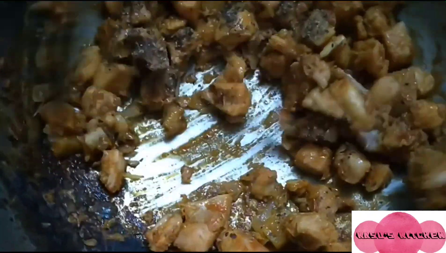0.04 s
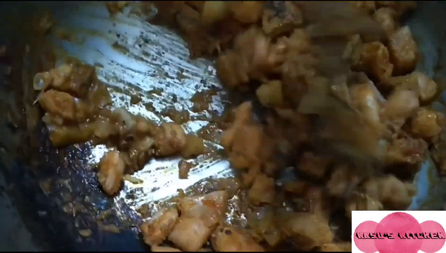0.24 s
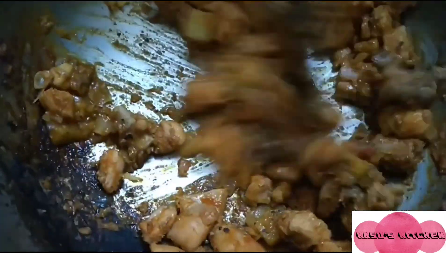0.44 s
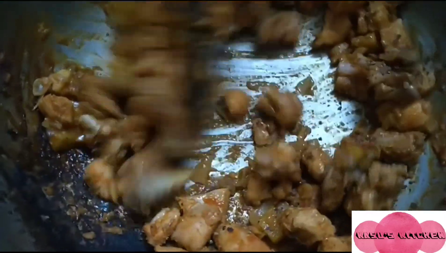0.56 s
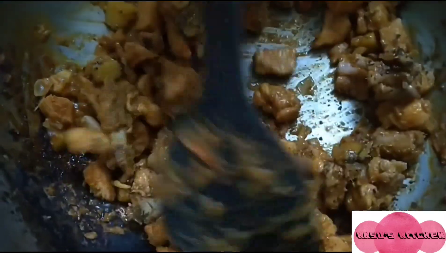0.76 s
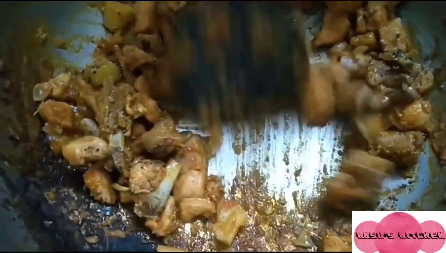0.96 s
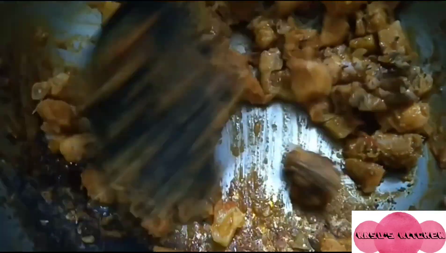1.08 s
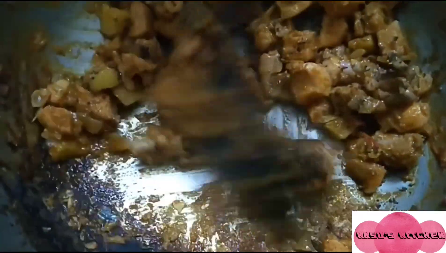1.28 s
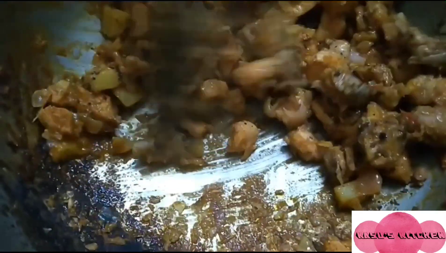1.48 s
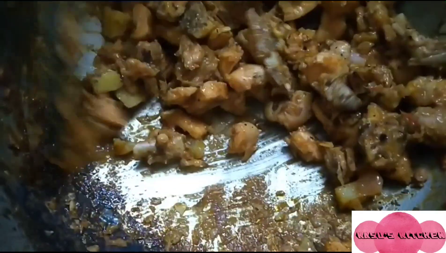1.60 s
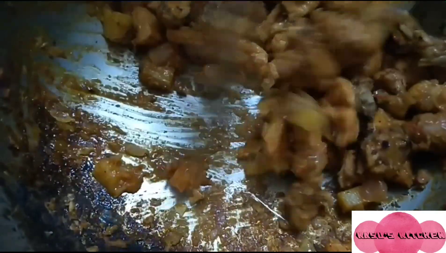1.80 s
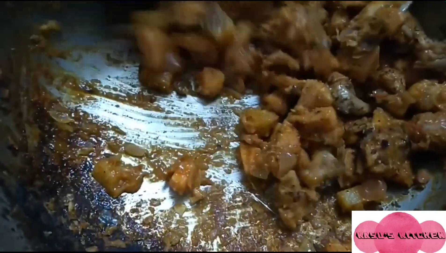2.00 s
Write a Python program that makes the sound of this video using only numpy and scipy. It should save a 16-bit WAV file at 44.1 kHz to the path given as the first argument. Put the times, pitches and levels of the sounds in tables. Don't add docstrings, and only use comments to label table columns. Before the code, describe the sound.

Stirring chicken in a steel pan: gritty spatula scrapes, two sharper knocks, small moist smacks.

```python
import sys
import numpy as np
from scipy import signal
from scipy.fft import rfft, irfft, next_fast_len
from scipy.io import wavfile

SR = 44100
rng = np.random.default_rng(int(sys.argv[2]) if len(sys.argv) > 2 else 0)


def decibels_to_gain(level_db):
    exponent = np.asarray(level_db, float) / 20
    return 10 ** exponent


def put_to_file(sound):
    columns = np.atleast_2d(sound).T
    safe = np.clip(columns, -1, 1)
    whole_steps = np.round(safe * 32767)
    wavfile.write(sys.argv[1], SR, whole_steps.astype(np.int16))


N = 90404

# pitch in Hz, level in dB per Hz.
AIR_COLOUR = [(25, 5), (60, 1.5), (280, -7), (400, -10), (2300, -17), (3300, -22.5), (5000, -46.5),
              (14000, -37.5)]
# pitch in Hz, width in Hz, level in dB.
HUM = [(98, 8, -76), (200, 10, -80), (288, 8, -77), (845, 25, -83)]
STROKE_STARTS = [-.02, .219, .250, .486, .555, .665, .965, 1.073, 1.180, 1.24, 1.360, 1.415, 1.485, 1.737,
                 1.805]
# hold in seconds, level in dB, extra brightness in dB per octave.
STROKES = [(0.11, -66, 0.5), (0.0016, -80, -11), (0.13, -64, -1.5), (0.026, -69, 1.5), (0.15, -70.5, -1),
           (0.089, -72.5, 3.5), (0.19, -86, 6), (0.1, -72, 1), (0.0069, -69.5, -0.5), (0.16, -80.5, -7),
           (0.013, -71, -1), (0.062, -71.5, -0.5), (0.074, -70.5, 1), (0.014, -73, 7.5), (0.089, -66, -2.5)]
# pitch in Hz, width in Hz, level in dB.
DRAG_COLOUR = [(2300, 900, 3), (3860, 2240, -1.5), (5710, 1400, -8.5), (6900, 1730, -2.5), (8480, 1570, -5),
               (11700, 2000, -9), (13000, 530, -7.5), (14800, 2900, -2)]
# start in seconds, peak in dB, pitch in Hz, T60 in seconds.
SMACKS = [(0.0074, -94, 14400, 0.012), (0.0597, -55, 7850, 0.024), (0.104, -69, 9880, 0.012),
          (0.282, -49.5, 12400, 0.013), (0.3072, -62, 5170, 0.018), (0.3693, -51, 7300, 0.021),
          (0.486, -55, 7470, 0.041), (0.537, -64.5, 8010, 0.022), (0.556, -52, 14600, 0.015),
          (0.5704, -71, 13700, 0.012), (0.583, -75, 7300, 0.011), (0.622, -56, 13000, 0.017),
          (0.671, -51, 8800, 0.0084), (0.679, -55, 13000, 0.015), (0.741, -60, 11500, 0.019),
          (0.7754, -62.5, 9650, 0.016), (0.9686, -64, 14000, 0.0097), (1.0742, -51.5, 13300, 0.0065),
          (1.118, -57, 8900, 0.02), (1.1837, -55, 8100, 0.034), (1.364, -58, 6600, 0.01),
          (1.4174, -65, 14300, 0.012), (1.4256, -57, 8850, 0.013), (1.4891, -52.5, 8000, 0.012),
          (1.5397, -53.5, 8200, 0.014), (1.8066, -52.5, 6940, 0.011), (1.8193, -47, 6940, 0.0095),
          (1.855, -53, 14800, 0.014), (1.8737, -59, 6800, 0.02), (1.945, -67, 12000, 0.012)]
# start in seconds, ring in dB, contact hardness in Hz, thud in dB.
KNOCKS = [(.030, -50, 804, -40), (0.088, -51, 510, -40.5), (0.22, -60, 1520, -39),
          (0.2497, -21, 1680, -28.5), (0.369, -48, 775, -37.5), (.487, -72, 2920, -45),
          (0.494, -50, 700, -45), (0.5223, -42, 820, -37.5), (.585, -55, 3120, -39.5),
          (.622, -51, 710, -41.5), (0.671, -60, 3000, -45.5), (1.113, -55, 2000, -44),
          (1.185, -71, 1990, -41), (1.212, -57, 600, -45.5), (1.247, -71, 604, -44),
          (1.284, -66, 600, -51.5), (1.364, -37, 636, -31), (1.523, -58, 885, -44.5),
          (1.737, -28.5, 2050, -32), (1.828, -56.5, 4160, -43)]
PAN_HZ = [460, 635, 845, 983, 1170, 1395, 1521, 1790, 2050, 2243, 2406, 2533, 3650, 3950]
# level in dB, T60 in seconds.
PAN_MODES = [(-11.5, 0.16), (0, 0.028), (1, 0.029), (-8, 0.029), (-9.5, 0.054), (-4.5, 0.083),
             (-7.5, 0.085), (1.5, 0.045), (-4, 0.067), (9, 0.021), (4, 0.042), (-21, 0.029), (4, 0.03),
             (-23, 0.013)]
# pitch in Hz, level in dB, T60 in seconds.
BASE_MODES = [(124, -16.5, 0.22), (193, -6.5, 0.043), (231.7, -8.5, 0.085), (308, -8, 0.079)]
FIRST_SPOT_DB = [-2.2, -1.7, -3.1, 2.4, -0.48, -0.21, 1.5, 3.1, 1.4, -1.2, 0.1, -1.3, -0.18, 0.1]
SECOND_SPOT_DB = [-0.8, -3.5, 5, -4.5, 4.2, -16, -13, -4.5, 2, 6, 5.8, -16, -5, 4]
# start in seconds, peak in dB, pitch in Hz, T60 in seconds,
# width as a share of pitch.
SKIDS = [(.030, -47.5, 4350, 0.11, 0.95), (.220, -53, 2200, 0.077, 0.21), (.250, -35.5, 5040, 0.011, 0.14),
         (.2585, -21, 2254, 0.046, 0.27), (.256, -37.5, 2115, 0.51, 0.23), (.251, -37.5, 3500, 0.13, 0.28),
         (.487, -49.5, 3540, 0.12, 0.92), (.585, -42, 2260, 0.2, 1), (.585, -36.5, 2850, 0.028, .15),
         (.670, -48, 3820, 0.063, 0.82), (1.113, -49, 2300, 0.11, 0.48), (1.737, -41.5, 3780, 0.027, 0.35),
         (1.184, -49, 2400, 0.24, 0.26), (1.184, -44, 4650, 0.048, 1), (1.362, -69, 3520, 0.066, 0.5),
         (1.737, -40, 8500, 0.052, 0.17), (1.737, -44, 6900, 0.04, 0.083),
         (1.828, -40.5, 2300, 0.099, 0.37), (1.85, -44.5, 2300, 0.23, 0.3)]
# start in seconds, level in dB, pitch in Hz, T60 in seconds.
CLINKS = [(0.24, -32, 3900, 0.019), (.2497, -47, 3644, 0.093), (0.3, -38.5, 1920, 0.022),
          (1.737, -41, 2065, 0.075), (1.737, -50.5, 480, 0.31), (1.737, -50, 740, 0.09),
          (1.736, -51, 3900, 0.014), (1.364, -52, 720, 0.11), (1.364, -54, 823, .1), (0.44, -48, 2700, .02),
          (1.8285, -41, 1925, 0.082), (.2497, -53, 2700, 0.097), (1.113, -52, 2230, 0.12),
          (1.113, -59.5, 4200, 0.078), (1.113, -51, 667, 0.063), (1.113, -61, 1350, 0.19),
          (1.184, -54, 645, 0.064), (.030, -49, 655, 0.062), (.507, -47, 1010, 0.019)]
# start in seconds, peak in dB, pitch in Hz, T60 in seconds.
TICKS = [(0.03, -60, 7900, .008), (0.29, -52, 13100, 0.0036), (0.308, -55, 8950, .005),
         (0.326, -61, 8300, .08), (0.326, -62, 6400, .08), (0.339, -51.5, 6300, 0.012),
         (0.350, -64, 7050, 0.0045), (0.356, -60, 7500, 0.0039), (0.413, -71, 7400, 0.015),
         (0.9173, -63.5, 4840, 0.01), (1.9403, -59, 4470, 0.0074), (1.063, -57, 14200, 0.0056),
         (1.275, -65, 5300, .008), (1.3329, -67, 8700, 0.007), (1.359, -55.5, 8900, 0.0065)]
# start in seconds, peak in dB, pitch in Hz, T60 in seconds.
SPITS = [
    (1.0445, -59, 4960, 0.0079),
    (1.135, -56, 8000, 0.012),
    (1.365, -56, 14000, .012),
    (1.472, -57, 6800, 0.011),
    (1.503, -61, 14000, .008),
    (1.520, -61, 13000, .006),
    (1.570, -62, 14000, .006),
    (1.612, -65, 6540, 0.016),
]
# pitch in Hz, sharpness, share removed from 0 to 1.
VALLEYS = [(395, 4.0, .95), (1603, 12.7, 0.55), (3000, 9.6, 0.43), (4656, 6.05, 0.3)]

FIRST_BLOW, SECOND_BLOW = 3, 18
PAN_LOW_HZ = 373
WET_DB = -0.5
DROP_WIDTH = 0.14


def rms_one(x):
    return x / np.sqrt(np.mean(x ** 2) + 1e-20)


def highpass(x, hz):
    return signal.sosfilt(signal.butter(3, hz, "high", fs=SR, output="sos"), x)


def drift(rate_hz):
    r = np.exp(-80 * np.pi * rate_hz / SR)
    noise = rng.standard_normal(N // 40 + 2002)
    slow = signal.lfilter([1], [1, -2 * r, r * r], noise)[2000:]
    return np.interp(np.arange(N) / 40, np.arange(len(slow)), rms_one(slow))


def ring(x, hz, t60):
    r, w = decibels_to_gain(-60 / (t60 * SR)), 2 * np.pi * hz / SR
    return signal.lfilter([0, np.sin(w)], [1, -2 * r * np.cos(w), r * r], x + 1e-18)


def resonance(x, hz, width_hz):
    t60 = 2.2 / width_hz
    return ring(ring(x, hz, t60), hz, t60)


def push(hz):
    t = np.arange(600) / SR
    force = t * np.exp(-2 * np.pi * hz * t)
    return force / force.sum()


def bursts(rows, gain_db):
    out, t = np.zeros(N + SR), np.arange(12000) / SR
    for s, db, hz, t60, width in rows:
        noise = rng.standard_normal(len(t))
        burst = highpass(rms_one(resonance(noise, hz, width * hz)), hz / 2)
        i = int(s * SR)
        out[i:i + len(t)] += decibels_to_gain(db + gain_db - 60 * t / t60) * burst
    return out[:N]


def air():
    noise_db, flicker_db = -65.5, 1.5
    out, edges = 0, 20 * 2 ** np.arange(0, 9.8, .5)
    white = rng.standard_normal((2, N))
    hz, db = np.transpose(AIR_COLOUR)
    for k, (low, high) in enumerate(zip(edges, edges[1:])):
        band = signal.sosfilt(signal.butter(2, [low, high], "band", fs=SR, output="sos"), white[k % 2])
        band_db = np.interp(np.log(low * high) / 2, np.log(hz), db)
        out = out + decibels_to_gain(band_db + flicker_db * drift(3.5)) * band
    hum = sum(decibels_to_gain(d) * rms_one(resonance(white[0], f, w)) for f, w, d in HUM)
    return decibels_to_gain(noise_db) * rms_one(out) + hum


def strokes():
    attack_s, sag_db_per_s, release_db_per_s, rest_db = .003, 32.5, 165, -91.5
    t = np.arange(N) / SR
    plain = bright = decibels_to_gain(rest_db) ** 2
    for s, (hold, db, bright_db) in zip(STROKE_STARTS, STROKES):
        age = t - s
        fall_db = sag_db_per_s * age + release_db_per_s * np.maximum(age - hold, 0)
        power = (np.clip(age / attack_s, 0, 1) * decibels_to_gain(db - np.maximum(fall_db, 0))) ** 2
        plain = plain + power
        bright = bright + power * decibels_to_gain(bright_db) ** 2
    return 10 * np.log10(plain), 10 * np.log10(bright / plain)


def edge_slips():
    slips_per_s, spread_db, clump_db = 4600, -2, 2.2
    grit_per_s, grit_db = 40, 1.5
    sizes = decibels_to_gain(spread_db * np.minimum(rng.exponential(1, N), 5)) * rng.choice([-1, 1], N)
    slips = sizes * (rng.random(N) < slips_per_s / SR) * decibels_to_gain(clump_db * drift(27.0))
    gritty = rng.random(N) < grit_per_s * 8 / SR * decibels_to_gain(6 * drift(30))
    return slips * np.where(gritty, decibels_to_gain(grit_db / 2), 1)


def drag():
    hiss_db, patch_db = 0.5, 3.5
    body_db, body_follows = -2, 0.29
    level_db, bright_db = strokes()
    slips = edge_slips()
    hiss = 0
    for k, (hz, width, db) in enumerate(DRAG_COLOUR):
        band = rms_one(resonance(slips, hz, 1.38 * width))
        band_db = db + patch_db * drift(15.3) + bright_db * np.log2(hz / 7000)
        hiss = hiss + (-1) ** k * decibels_to_gain(band_db) * band
    body = sum(decibels_to_gain(d) * ring(slips, hz, 0.98 * t) for hz, (d, t) in zip(PAN_HZ, PAN_MODES))
    body = rms_one(highpass(body, PAN_LOW_HZ))
    mean_db = level_db.mean()
    body_level_db = mean_db + body_follows * (level_db - mean_db) + body_db
    return decibels_to_gain(level_db + hiss_db) * hiss + decibels_to_gain(body_level_db) * body


def smacks():
    return bursts([(*row, 0.36) for row in SMACKS], WET_DB)


def knocks():
    mode_scatter_db, ring_trim_db = 2, -8.5
    crack_hz, crack_t60_s, crack_db = 1276, 0.0056, 9.5
    chatter_db, chatter_t60_s = -27.5, 0.084
    thud_cut_hz, thud_lead_s, base_low_hz = 231, 0.0014, 105.5
    pans, bases, size = np.zeros(N + SR), np.zeros(N + SR), SR // 4
    spots_db = mode_scatter_db * rng.standard_normal((len(KNOCKS), len(PAN_MODES)))
    spots_db[FIRST_BLOW], spots_db[SECOND_BLOW] = FIRST_SPOT_DB, SECOND_SPOT_DB
    cracks_db = np.full(len(KNOCKS), crack_db)
    cracks_db[SECOND_BLOW] -= 3.5
    chatter_fade = decibels_to_gain(chatter_db - 60 * np.arange(size) / SR / chatter_t60_s)
    click = np.zeros(size)
    click[0] = -1
    soft = np.convolve(click, push(thud_cut_hz))[:size]
    thud = sum(decibels_to_gain(d) * ring(soft, hz, t) for hz, d, t in BASE_MODES)
    for (s, db, hard_hz, thud_db), spot_db, snap_db in zip(KNOCKS, spots_db, cracks_db):
        hit = np.convolve(click, push(hard_hz))[:size]
        rattle = rng.standard_normal(size) * chatter_fade
        shaken = hit + np.convolve(rattle, push(hard_hz))[:size]
        pan = sum(decibels_to_gain(d + ring_trim_db + extra) * ring(shaken, hz, t)
                  for hz, (d, t), extra in zip(PAN_HZ, PAN_MODES, spot_db))
        crack = decibels_to_gain(snap_db) * ring(hit, crack_hz, crack_t60_s)
        i = int(s * SR)
        pans[i:i + size] += decibels_to_gain(db) * (pan + crack)
        i -= int(thud_lead_s * SR)
        bases[i:i + size] += decibels_to_gain(thud_db) * thud
    bases = highpass(highpass(bases[:N], base_low_hz), base_low_hz)
    return highpass(pans[:N], PAN_LOW_HZ) + bases


def skids():
    return bursts(SKIDS, -9)


def ticks():
    return bursts([(*row, DROP_WIDTH) for row in TICKS], WET_DB)


def clinks():
    out = np.zeros(N)
    for s, db, hz, t60 in CLINKS:
        click = np.zeros(N)
        click[int(s * SR)] = decibels_to_gain(db)
        out += ring(click, hz, t60)
    return highpass(out, PAN_LOW_HZ)


def spits():
    return bursts([(*row, DROP_WIDTH) for row in SPITS], WET_DB)


def valleys(x):
    for hz, sharp, share in VALLEYS:
        x = x - share * signal.lfilter(*signal.iirpeak(hz, sharp, fs=SR), x)
    return x


def kitchen(x):
    t60_s, wall_cut_hz, low_hz = 0.43, 7400, 191
    size = next_fast_len(N + SR)
    z = np.exp(-2j * np.pi * np.arange(size // 2 + 1) / size)
    dull = np.exp(-2 * np.pi * wall_cut_hz / SR)
    lowpass = (1 - dull) / (1 - dull * z)
    gain = 0
    for k, lag in enumerate((rng.uniform(.011, .045, 28) * SR).astype(int)):
        loop = decibels_to_gain(-60 * lag / SR / t60_s) * lowpass * z ** lag
        gain = gain + (-1) ** k * loop / (1 - loop)
    for lag in (61, 173):
        gain = gain * (z ** lag - .6) / (1 - .6 * z ** lag)
    wet = irfft(rfft(x, size) * gain, size)[:N]
    return signal.sosfilt(signal.butter(2, low_hz, "high", fs=SR, output="sos"), wet)


def scene():
    pan = valleys(drag() + smacks() + knocks() + skids() + ticks() + clinks())
    echo = decibels_to_gain(-22.5) * kitchen(pan)
    return (pan + echo + air() + spits())[None]


def top_cut(x):
    return signal.sosfilt(signal.butter(12, 16460, fs=SR, output="sos"), x)


def record(dry):
    mix = signal.sosfilt(signal.cheby2(12, 50, 16000, fs=SR, output="sos"), dry)
    return top_cut(mix)


dry = scene()
out = record(dry)
put_to_file(out)
```